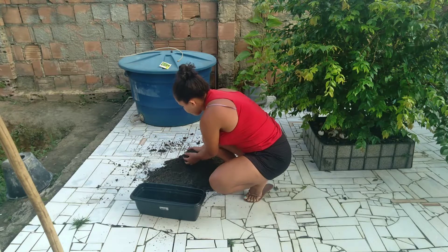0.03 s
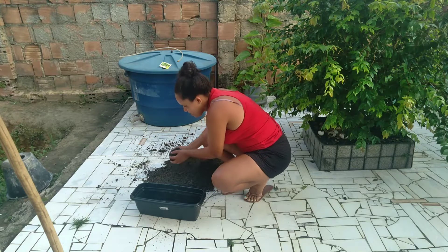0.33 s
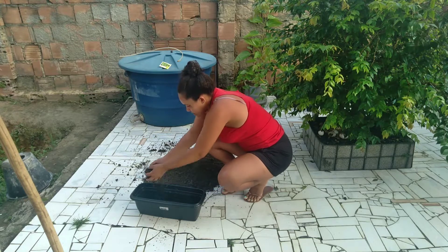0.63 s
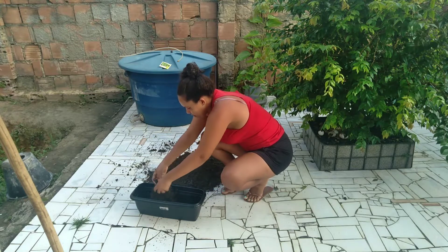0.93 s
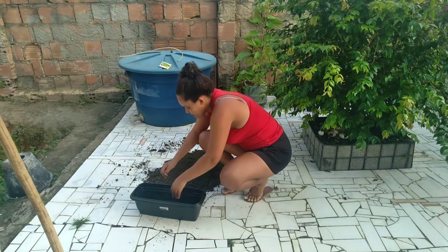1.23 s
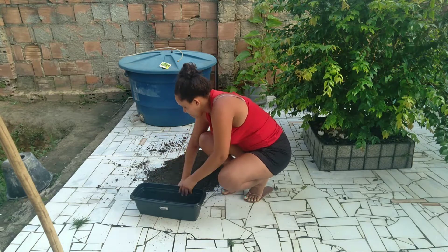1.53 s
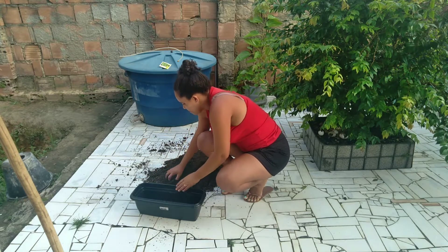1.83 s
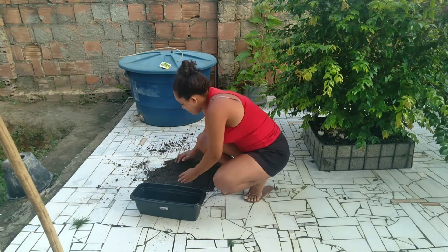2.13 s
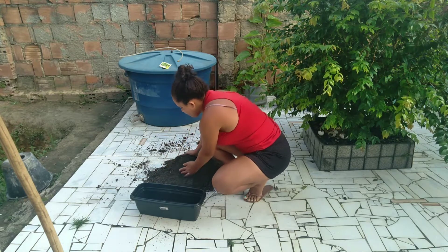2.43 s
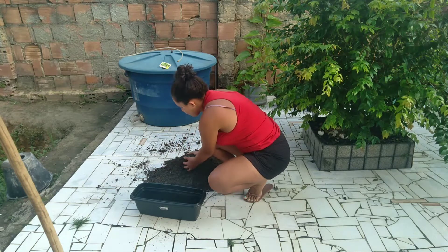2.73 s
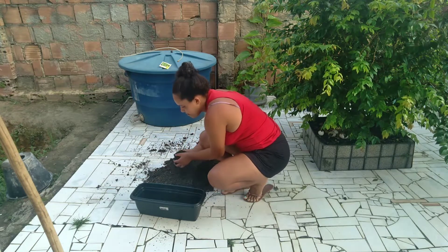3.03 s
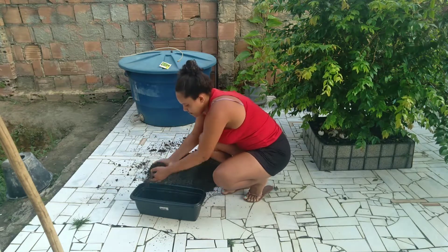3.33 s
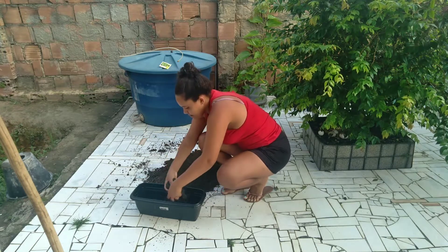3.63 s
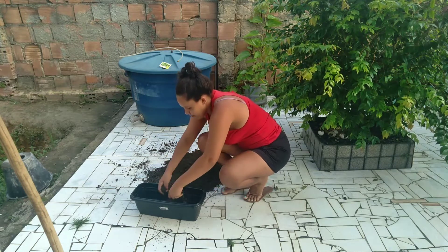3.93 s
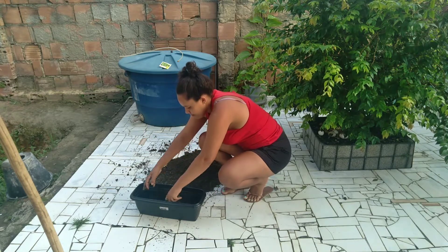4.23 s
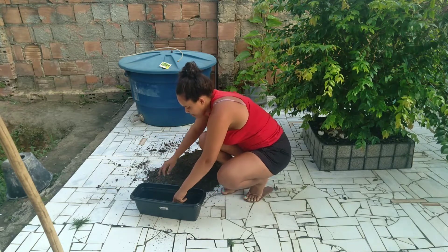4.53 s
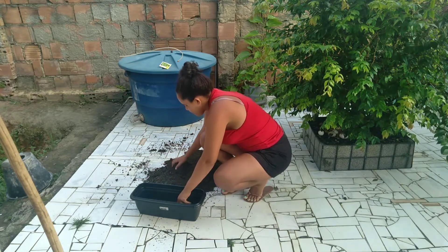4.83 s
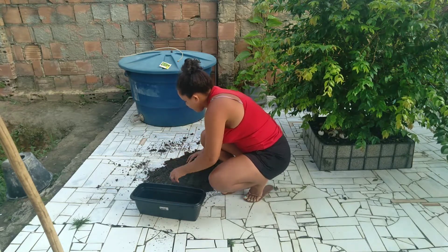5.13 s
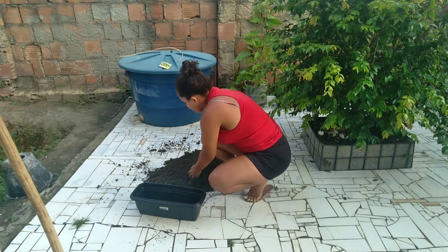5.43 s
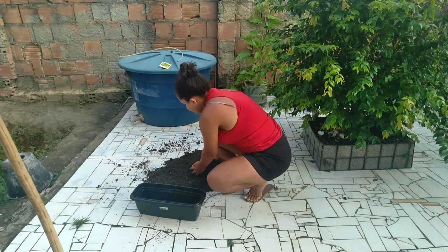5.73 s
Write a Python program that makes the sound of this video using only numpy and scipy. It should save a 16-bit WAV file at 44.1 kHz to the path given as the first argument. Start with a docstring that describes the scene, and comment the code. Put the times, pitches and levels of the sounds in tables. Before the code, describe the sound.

Crumbly earth drops twice into a plastic tub with dull thuds, followed by light scraping, with faint high bird chirps.

```python
"""In a walled, tiled yard a handful of loose soil drops into a plastic tub: crumbs fizz, and clods
patter and make the tub ring. In the pause come a few soft, low thumps, and small birds start to chirp.
A second handful falls at about 3 s; then fingers rake the heap, and at the end hard bits clack together.
All along there is a faint hush, the walls echo, and a noise gate turns the yard down while soil is still."""
import sys
import numpy as np
from scipy import signal
from scipy.io import wavfile
from scipy.ndimage import uniform_filter1d, minimum_filter1d

SR = 44100
rng = np.random.default_rng(int(sys.argv[2]) if len(sys.argv) > 2 else 0)


def dump_mix(stems):
    """Bounce the given channels to the path in sys.argv[1] as a 16-bit WAV at rate SR."""
    frames = np.atleast_2d(stems).T  # one column per channel
    limited = np.clip(frames, -1, 1)  # hard clip at full scale
    pcm = np.round(limited * 32767).astype(np.int16)
    wavfile.write(sys.argv[1], SR, pcm)


N = 264159
TIME = np.arange(N) / SR


def pouring():
    """Soil leaves the hands: its mass and clods drum on the tub, crumbs fizz and bits of grit tick."""
    mass = band(patter(150, 370, per_s=300, spread_db=4, cycles=0.26), 170, 360, order=3)
    clods = band(tub(patter(400, 2000, per_s=900, spread_db=1.0, cycles=0.84)), 340, 2400, order=3)
    crumbs = band(patter(2600, 9600, per_s=3500, spread_db=2.0, cycles=0.3), 2600, 10000)
    grit = band(patter(1600, 7500, per_s=280, spread_db=6.5, cycles=5.8), 2000, 18000)
    fine = clumped(evened(crumbs) + amp(-6.5) * evened(grit))
    mass_level, clod_level, crumb_level = flow()
    return (mass_level * steadied(mass)
            + amp(4) * clod_level * steadied(clumped(clods))
            + amp(-1) * crumb_level * steadied(fine))


# How hard the soil pours, one curve per handful and one for the rest shaken off: t/s, level/dB
POURS = [
    [(0.522, -47.5), (0.54, -32), (0.584, -42.5), (0.59, -42.5), (0.64, -43.5), (0.878, -28),
     (1.004, -43.5), (1.09, -31), (1.234, -47), (1.25, -40)],
    [(3.224, -49), (3.25, -29.5), (3.282, -42.5), (3.36, -32), (3.368, -27), (3.38, -34.5), (3.452, -30.5),
     (3.626, -42.5), (3.712, -27.5), (3.724, -32.5), (3.97, -45.5)],
    [(4.037, -33.5), (4.163, -42.5), (4.205, -53)],
]
# What each pour holds: crumbs at start/dB, crumbs at end/dB, bulk lands at t/s, bulk level/dB
POUR_CONTENTS = [(-33.5, -43, 0.9, -36), (-37, -37, 3.52, -36.5), (-42, -31.5, 4.04, -78)]
def flow(edge_s=0.0017, bulk_rise_s=0.01, bulk_fade_s=0.25, full_flow_db=-34, drum_db=-20):
    """How strong mass, clods and crumbs are over time: the bulk lands quickly and settles slowly."""
    levels = np.zeros((3, N))
    for curve, (first_db, last_db, bulk_s, bulk_db) in zip(POURS, POUR_CONTENTS):
        s, db = np.transpose(curve)
        inside = np.clip(np.minimum(TIME - s[0], s[-1] - TIME) / edge_s + .5, 0, 1)
        flow_db = np.interp(TIME, s, db)
        bulk = np.exp(-np.maximum((bulk_s - TIME) / bulk_rise_s, (TIME - bulk_s) / bulk_fade_s))
        mass = amp(bulk_db) * bulk + amp(flow_db + drum_db)  # any flow drums a little
        crumbs_db = np.interp(TIME, s[[0, -1]], [first_db, last_db])
        crumbs_db += 0.87 * (flow_db - full_flow_db)  # crumbs keep trickling as the flow slackens
        levels += inside * np.array([mass, amp(flow_db), amp(crumbs_db)])
    return levels


# Lumps that land in the tub: t/s, level/dB, extra level of the bright tick/dB
LUMP_LANDINGS = [(0.506, -27, 6), (0.526, -21.5, 0), (0.589, -19.5, -21), (0.668, -24.5, -5),
                 (0.696, -24, 9.5), (0.819, -10.5, -8), (0.867, -15, -22.5), (0.935, -12, -20),
                 (1.046, -5.5, -9.5), (1.082, -14.5, -31), (1.15, -13, -12), (3.243, -15.5, -24.5),
                 (3.366, -14.5, -8.5), (3.468, -9.5, -29), (3.705, -5.5, -4.5), (3.99, -21, 1),
                 (4.093, -30.5, 14.5), (4.215, -14.5, -46), (4.246, -40.5, 13), (4.304, -11.5, -24),
                 (4.315, -25.5, -10.5), (4.382, -35, -4.5)]
def lumps(thud_hz=620, tick_hz=4200, crumble_s=0.017, debris=0.4, tick_db=4, weight_db=-9):
    """Each lump lands with one weighty blow and breaks into smaller ones."""
    out, t = np.zeros(N), np.arange(SR // 5) / SR
    for s, db, treble_db in LUMP_LANDINGS:
        splinters = rng.standard_normal((2, len(t))) * (rng.random((2, len(t))) < .08)
        blows = debris * splinters * np.exp(-t / crumble_s)  # one row thuds, the other ticks
        blows[1] /= 2  # splinters tick more softly
        blows[:, SR // 1000] = 1  # the first contact
        thud = band(tub(through(blows[0], grain(thud_hz, cycles=0.38))), 490, 5000)
        tick = band(through(blows[1], grain(tick_hz, cycles=.5)), 1400, 10500, order=3)
        weight = band(through(blows[0], grain(400, cycles=3.0)), 220, 520, order=3)
        lump = peaked(thud) + amp(treble_db + tick_db) * peaked(tick) + amp(weight_db) * peaked(weight)
        add(out, s, amp(db) * lump)
    return amp(-5.5) * out


# The notes the tub rings at: f/Hz, level/dB
TUB_NOTES = [(328.4, -41), (436.0, -47.5), (500.6, -41.5), (635.2, -49.5), (726.7, -44.5), (958.2, -54),
             (1039, -52), (1405, -51), (1507, -57.5), (1701, -47), (1981, -51.5)]
def tub(x, ring_db=-12, ring_s=0.089):
    """The blow itself plus the short ring of the plastic walls, muffled by the soil inside."""
    t = np.arange(SR // 4) / SR
    ring = sum(amp(db - 60 * t / ring_s) * np.cos(2 * np.pi * hz * t) for hz, db in TUB_NOTES)
    return x + amp(ring_db) * through(x, ring / np.linalg.norm(ring))


# Short drags of the fingers: t/s, length/s, coarse grains/dB, fine grains/dB
FINGER_DRAGS = [(0.476, 0.04, -45.5, -53), (2.206, 0.047, -62, -54.5), (3.148, 0.45, -68, -42.5),
                (4.549, 0.069, -54.5, -39), (5.474, 0.14, -46, -50), (5.865, 0.071, -49, -50)]
def raking(fade_db=7):
    """Fingers drag through the heap: a dense scratch of grains that fades as the hand slows."""
    coarse = band(patter(780, 2100, per_s=4000, spread_db=0.5, cycles=0.98), 610, 3500, order=5)
    fine = band(patter(2700, 12000, per_s=2400, spread_db=3.5, cycles=0.38), 1388, 9800, order=6)
    out = np.zeros(N)
    for s, length, coarse_db, fine_db in FINGER_DRAGS:
        progress = np.clip((TIME - s) / length, 0, 1)
        stroke = np.clip(10 * np.minimum(progress, 1 - progress), 0, 1) * amp(-fade_db * progress)
        out += stroke * (amp(coarse_db) * evened(coarse) + amp(fine_db) * evened(fine))
    return out


# Hard bits meeting in the heap: t/s, level/dB, f/Hz, ring/cycles
HARD_BITS = [(5.515, -30.5, 1500, 1.4), (5.889, -29.5, 867, 2.4), (5.902, -31.5, 689, 9.8),
             (5.932, -40.5, 571, 73)]
def clacks():
    """Hard bits hit each other with small hollow knocks."""
    out = np.zeros(N)
    for s, db, hz, cycles in HARD_BITS:
        add(out, s, amp(db) * grain(hz, cycles))
    return band(out, 565, 5000)


# Soft, low thumps between the handfuls: t/s, level/dB, f/Hz
SOFT_THUMPS = [(1.514, -34, 175), (1.662, -32.5, 114), (1.808, -27.5, 123), (1.841, -19.5, 126),
               (1.893, -35, 121), (1.941, -37.5, 122), (1.979, -39, 245), (2.048, -30, 122),
               (2.072, -35.5, 108)]
def thumps(swell_cycles=0.29, knock_db=-24):
    """Dull pushes of a cycle or two, each with a faint knock at its start."""
    out, t = np.zeros(N), np.arange(SR // 10) / SR
    for s, db, hz in SOFT_THUMPS:
        age = t * hz / swell_cycles
        push = age ** 2 * np.exp(-age) * np.sin(2 * np.pi * hz * t)
        add(out, s, amp(db) * peaked(push))
        add(out, s + 0.0021, amp(db + knock_db) * grain(420, cycles=3.0))
    return out


# Kinds of chirp: length/s, last pitch over first, share spent sliding, buzz, strength of lower voice
RISE = (0.085, 1.1, 0.55, 0.034, 0)
HOLD = (0.26, 1.025, 0.38, 0.025, 0)
SLUR = (0.155, 0.9, 0.78, 0.026, 0)
SWOOP = (0.17, 0.61, 0.75, 0.046, 0)
DOUBLE = (0.2, 0.88, 0.48, 0.0334, 0.42)
TICK = (0.0045, 0.92, 0.93, 0.041, 0.022)
# The birds' song: t/s, first f/Hz, level/dB, kind of chirp
CHIRPS = [(1.345, 5550, -71.5, RISE), (1.489, 6860, -79, RISE), (1.49, 2546, -72.5, RISE),
          (1.581, 5240, -59.5, RISE), (1.73, 7950, -57, SLUR), (1.896, 5340, -55, RISE),
          (1.99, 8600, -57.5, SLUR), (2.1, 3240, -70, RISE), (2.109, 8310, -50, SWOOP),
          (2.27, 8840, -51.5, DOUBLE), (2.441, 7170, -49.5, SWOOP), (2.61, 8700, -50, DOUBLE),
          (2.773, 5146, -48.5, RISE), (2.82, 8500, -48, SWOOP), (3.004, 7690, -46, RISE),
          (3.889, 5380, -54.5, RISE), (3.899, 7000, -53, RISE), (4.181, 7490, -53, HOLD),
          (4.39, 5400, -57, SLUR), (4.525, 6040, -45, RISE), (4.656, 7390, -45, SLUR),
          (4.82, 5090, -59, RISE), (4.829, 8840, -51, DOUBLE), (4.98, 7820, -35, TICK),
          (5.055, 7640, -48.5, SLUR), (5.179, 7370, -32.5, TICK), (5.245, 8730, -51, DOUBLE),
          (5.459, 8400, -52.5, SWOOP), (5.658, 8240, -50, SLUR), (5.749, 7970, -27.5, TICK),
          (5.801, 7760, -53.5, RISE), (5.85, 7640, -60, SWOOP)]
def birds(bend=1.4, landed_buzz=0.2, lower_ratio=0.47, lower_glide=0.9, lower_enters=0.36):
    """Each chirp slides to its last pitch and clears as it lands; in some a lower voice joins in."""
    out = np.zeros(N)
    for s, first_hz, db, (length, glide, gliding, buzz, lower) in CHIRPS:
        progress = np.linspace(0, 1, int(length * SR))
        eased = np.sin(np.pi / 2 * np.minimum(progress / gliding, 1) ** bend) ** 2
        rasp = buzz * np.where(progress < gliding, 1, landed_buzz)
        add(out, s, amp(db) * whistle(first_hz * glide ** eased, rasp))
        lower_progress = np.linspace(0, 1, np.sum(progress > lower_enters))
        lower_hz = lower_ratio * first_hz * lower_glide ** np.interp(lower_progress, progress, eased)
        add(out, s + lower_enters * length, lower * amp(db) * whistle(lower_hz, buzz))
    return out


def whistle(hz, buzz):
    """A thin note that swells and fades; a fast shake in its pitch makes it buzz."""
    swell = np.sin(np.pi * np.linspace(0, 1, len(hz)) ** 1.07)
    return evened(swell * np.sin(wavering_phase(hz, buzz, smooth_samples=70)))


# Faint calls from far away: t/s, length/s, first f/Hz, last f/Hz, level/dB
DISTANT_CALLS = [(0.029, 0.14, 729, 702, -63.5), (2.113, 0.18, 767.6, 726.6, -60),
                 (2.896, 0.11, 914, 986, -64), (2.969, 0.25, 1092, 1219, -64.5)]
def far_calls(harmonics_db=(-2, 0, -14), waver=0.022):
    """Soft wavering calls from beyond the wall."""
    out = np.zeros(N)
    for s, length, first_hz, last_hz, db in DISTANT_CALLS:
        hz = np.linspace(first_hz, last_hz, int(length * SR))
        phase = wavering_phase(hz, waver, smooth_samples=300)
        call = sum(amp(part_db) * np.sin(k * phase) for k, part_db in enumerate(harmonics_db, 1))
        add(out, s, amp(db) * evened(call * np.hanning(len(call))))
    return out


# How long the yard echoes: f/Hz, time to fade by 60 dB/s
ECHO_TIMES = [(150, 0.1), (600, 0.4), (3000, 0.42), (7000, 0.34), (14000, 0.22)]
def yard(x, echoes_per_s=3000):
    """Scattered echoes from the walls and tiles, each pitch dying away at its own speed."""
    echoes = rng.choice([-1., 1.], SR) * (rng.random(SR) < echoes_per_s / SR)
    echoes *= np.arange(SR) > SR // 200  # none in the first 5 ms
    hz, t, spectrum = signal.stft(echoes, SR, nperseg=256)
    fade = amp(-60 * t / read(ECHO_TIMES, hz)[:, None])
    tail = signal.istft(spectrum * fade, SR, nperseg=256)[1]
    return through(x, tail / np.linalg.norm(tail))


# The tone of the outdoor hush: f/Hz, level/dB
HUSH_TONE = [(25, -28), (60, 3.5), (140, 5.5), (450, -4.5), (1500, -17), (5000, -27.5), (15000, -30)]
# How loud the low drone is: t/s, level/dB
DRONE_LEVELS = [(0, -61.5), (0.25, -54), (1.9, -51), (2.4, -65)]
def air(hush_db=-62):
    """A faint outdoor hush and the low drone of the surroundings."""
    hush = evened(coloured(rng.standard_normal(N), HUSH_TONE))
    drone = evened(band(rng.standard_normal(N), 88, 145))
    drone_db = np.interp(TIME, *np.transpose(DRONE_LEVELS))
    return amp(hush_db) * hush + amp(drone_db) * drone


def grain(hz, cycles):
    """One small hit: a ring that drops to about a third every `cycles` swings."""
    turns = np.arange(int(8 * cycles * SR / hz) + 2) * hz / SR
    return np.sin(2 * np.pi * turns) * np.exp(-turns / cycles)


def patter(low_hz, high_hz, per_s, spread_db, cycles, kinds=16):
    """A steady shower of grains of many sizes, most of them light and a few heavy."""
    strength = amp(spread_db * np.minimum(rng.exponential(1, N), 4))
    hits = strength * rng.choice([-1, 1], N) * (rng.random(N) < per_s / SR)
    kind = rng.integers(0, kinds, N)
    return sum(through(hits * (kind == k), grain(hz, cycles)) * np.sqrt(hz)
               for k, hz in enumerate(np.geomspace(low_hz, high_hz, kinds)))


def clumped(shower, depth_db=2.0):
    """Soil falls in little clumps, a few dozen a second."""
    return shower * amp(depth_db * evened(band(rng.standard_normal(N), 11, 55)))


def steadied(shower):
    """Holds a shower at an even strength."""
    return shower / np.sqrt(power(shower, seconds=0.092))


def wavering_phase(hz, depth, smooth_samples):
    """The running angle of a wave whose pitch shakes at random."""
    shake = evened(uniform_filter1d(rng.standard_normal(len(hz)), smooth_samples))
    return 2 * np.pi * np.cumsum(hz * (1 + depth * shake)) / SR


def amp(db):
    """Turns decibels into a multiplier."""
    return 10 ** (np.asarray(db) / 20)


def evened(x):
    """Scales a sound to an average strength (rms) of 1."""
    return x / np.sqrt(np.mean(x ** 2) + 1e-20)


def peaked(x):
    """Scales a sound to a peak of 1."""
    return x / abs(x).max()


def power(x, seconds):
    """A running average of the squared sound."""
    size = max(int(seconds * SR / 2), 1)
    return abs(uniform_filter1d(uniform_filter1d(x ** 2, size), size)) + 1e-14


def read(points, hz):
    """Looks up a table by pitch, with octaves evenly spaced."""
    f, value = np.transpose(points)
    return np.interp(np.log(hz + 1), np.log(f + 1), value)


def add(mix, s, sound):
    """Mixes a sound in at time s."""
    part = mix[max(round(s * SR), 0):][:len(sound)]
    part += sound[:len(part)]


def through(x, response):
    """Lets every sample set off a copy of the response."""
    return signal.oaconvolve(x, response)[:len(x)]


def band(x, low_hz, high_hz, order=2):
    """Keeps what lies between two pitches."""
    return signal.sosfilt(signal.butter(order, [low_hz, high_hz], "band", fs=SR, output="sos"), x)


def coloured(x, points, size=4096):
    """Shapes the tone by a table, with no ringing ahead of a hit."""
    log_gain = np.log(amp(read(points, abs(np.fft.fftfreq(size, 1 / SR)))))
    spectrum = np.exp(np.conj(signal.hilbert(log_gain)))
    return through(x, np.fft.ifft(spectrum).real[:size // 2])


def scene():
    """The soil is close by; the birds are farther off, so more of their sound is echo."""
    soil = pouring() + raking() + lumps() + clacks()
    song = birds() + far_calls()
    return (soil + amp(-10.5) * yard(soil) + thumps() + song + amp(-0.5) * yard(song) + air())[None]


# The tone of the microphone: f/Hz, level/dB
MIC_TONE = [(25, -16.5), (60, -7), (300, -4), (2500, 2), (7500, 0.5), (9000, -4.5), (11000, -10.5),
            (15000, -9)]
def record(dry, threshold_db=-47, knee_db=3, depth_db=13, hiss_db=-89, top_hz=15700):
    """A gate turns all down when lows and mids are quiet; the microphone adds its tone and hiss."""
    level_db = 10 * np.log10(power(band(dry[0], 73.4, 3000, order=5), seconds=0.0056))
    held_db = -minimum_filter1d(-level_db, size=400)  # a short hold keeps the gate from fluttering
    shut = uniform_filter1d(.5 - .5 * np.tanh((held_db - threshold_db) / knee_db), size=100)
    gated = dry[0] * amp(-depth_db * shut)
    heard = coloured(gated, MIC_TONE) + amp(hiss_db) * rng.standard_normal(N)
    treble_cut = signal.firwin(511, top_hz, window=("kaiser", 9), fs=SR)
    return signal.oaconvolve(heard, treble_cut, "same")[None]


dry = scene()
out = record(dry)
dump_mix(out)
```